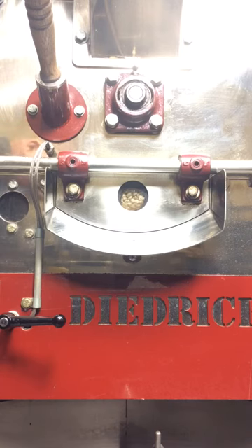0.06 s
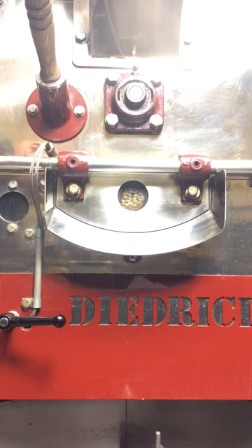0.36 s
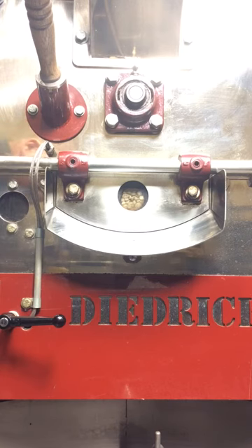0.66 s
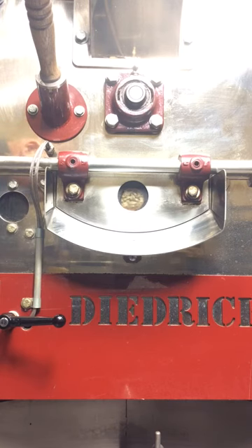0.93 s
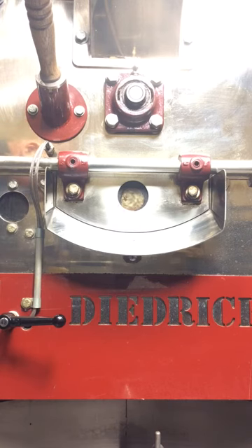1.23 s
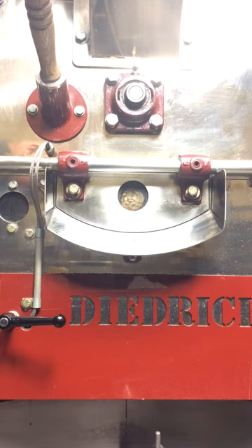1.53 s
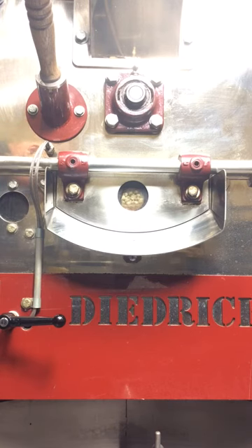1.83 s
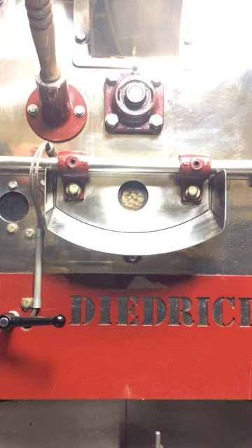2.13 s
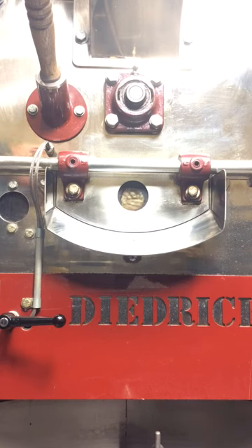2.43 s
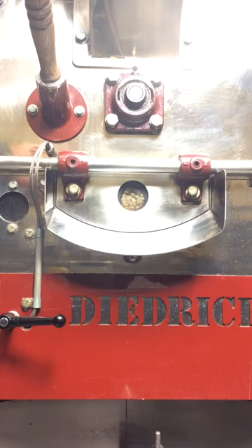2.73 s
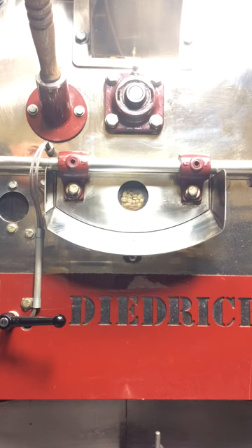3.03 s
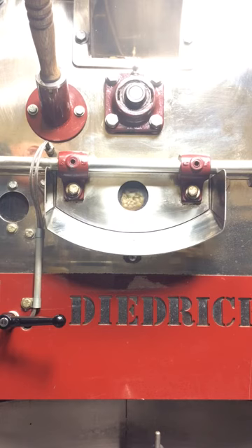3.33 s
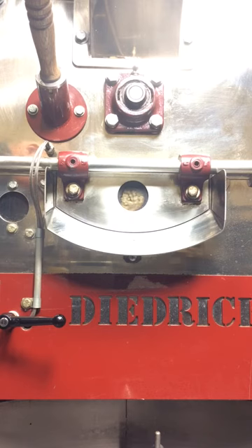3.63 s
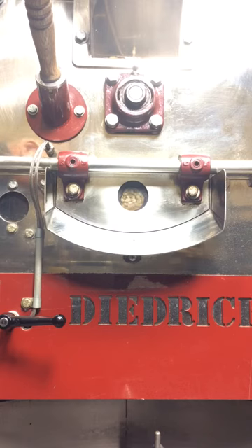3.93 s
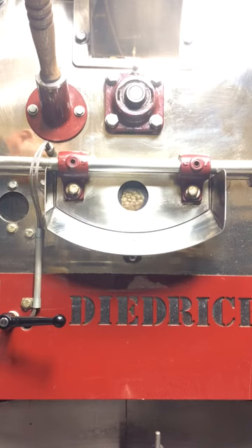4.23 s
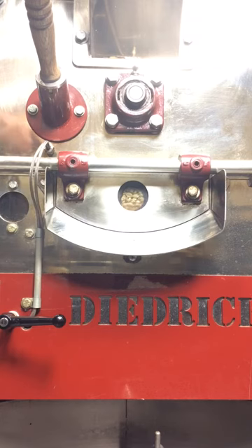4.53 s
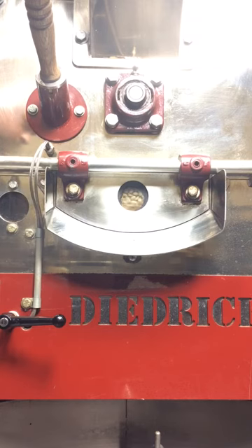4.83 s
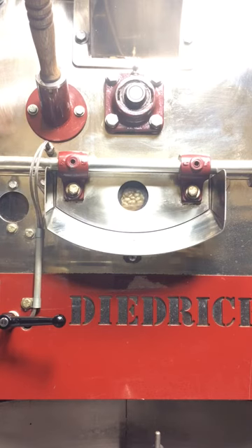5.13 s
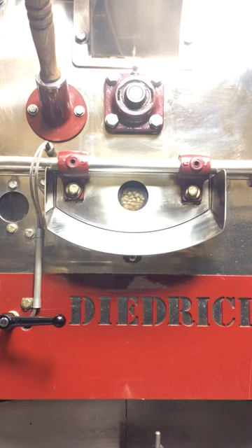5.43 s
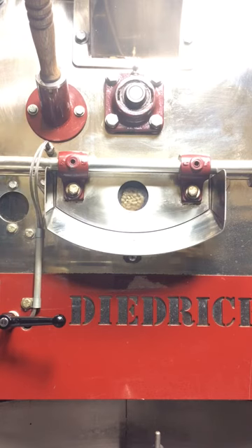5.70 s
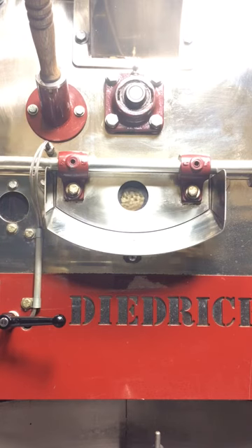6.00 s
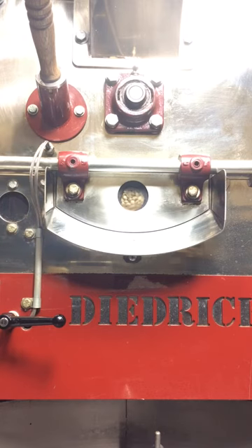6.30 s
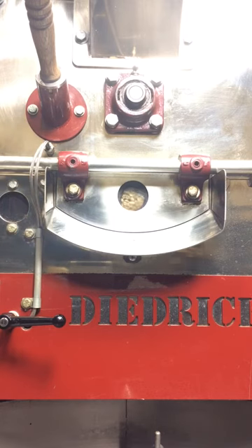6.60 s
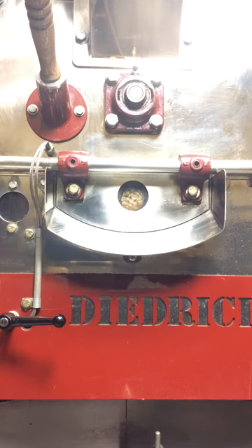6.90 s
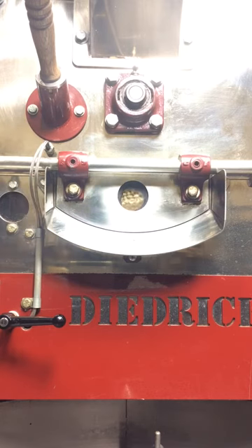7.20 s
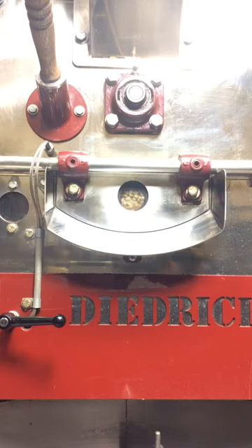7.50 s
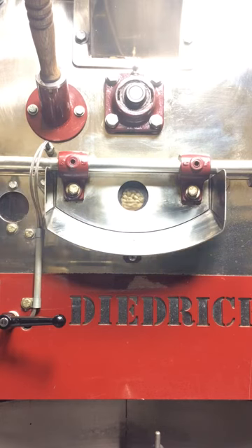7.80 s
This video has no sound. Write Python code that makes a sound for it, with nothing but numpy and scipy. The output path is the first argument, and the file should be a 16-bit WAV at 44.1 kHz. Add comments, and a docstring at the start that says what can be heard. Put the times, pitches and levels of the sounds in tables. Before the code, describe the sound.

Close to a drum coffee roaster indoors, beans swish and rattle lightly in a regular rhythm, roughly three showers a second, with tiny pings and occasional sharper ticks against steel. Beneath them, and louder, the fan and motor drone on one pitch while the gas flame rumbles and air rushes. The machine keeps going throughout with hardly any change.

```python
"""Gas-fired drum coffee roaster, up close

Flame booming in the firebox and draught rushing through the ducts lay down a steady bed, and the
blower sings over it on its blade rate. The tumbling load rings the steel shell softly. On top, vanes
throw the beans about three times a second: each shower is a surge of hiss and tiny pings, and now
and then a stray bean ticks on the metal."""
import sys
import numpy as np
from scipy import signal
from scipy.fft import rfft, irfft
from scipy.io import wavfile

SR = 44100
rng = np.random.default_rng(int(sys.argv[2]) if len(sys.argv) > 2 else 0)


def output_pcm(signal):
    """Save a mono or channel-first signal as 16-bit PCM at the path in sys.argv[1].

    Samples are clipped to [-1, 1] before scaling.
    """
    pcm = np.clip(np.atleast_2d(signal).T, -1, 1) * 32767
    wavfile.write(sys.argv[1], SR, np.round(pcm).astype(np.int16))


N = 350595

# rush of the draught: (frequency [Hz], level [dB per Hz])
DRAUGHT_SPECTRUM = [(200, -82), (370, -61), (474, -61.5), (502, -76.5), (620, -72.5), (675, -77),
                    (790, -80), (930, -83.5), (1500, -92.5), (6000, -110)]
# air resonances of the ducts: (frequency [Hz], width [Hz], level [dB per Hz])
DUCT_MODES = [(534, 26.6, -65), (581.6, 14.6, -66.5)]
# swell of the duct resonances as the draught picks up: (time [s], gain [dB])
DUCT_SWELL = [(0, -1.5), (3.8, -1), (4.7, 2.5), (5.4, 1.5), (6.2, 0), (7.95, 0.5)]
# boom of the flame: (frequency [Hz], level [dB per Hz])
FLAME_SPECTRUM = [(20, -95), (30, -87), (38, -86), (48, -85), (57, -66), (68, -67.5), (100, -55.5),
                  (150, -52.5), (345, -50), (385, -70), (600, -100)]
# air resonances of the firebox: (frequency [Hz], width [Hz], level [dB per Hz])
FIREBOX_MODES = [(167, 29, -53), (183.2, 9.1, -47.5), (299, 37, -49)]
# brief chance swells in the low rumble, at the firebox resonances: (time [s], frequency [Hz], level [dB])
RUMBLE_SWELLS = [(0.05, 178, -28), (0.41, 190, -28), (0.591, 197, -27), (0.82, 165, -24.5),
                 (1.15, 180, -31.5), (1.23, 292, -28), (1.481, 168, -28), (2.639, 295, -28),
                 (2.83, 306, -27.5), (3.14, 300, -25), (3.28, 174, -27.5), (4.29, 299, -28.5),
                 (4.49, 292, -29), (5.329, 180, -25.5), (5.86, 295, -28.5), (6.25, 295, -26.5),
                 (6.38, 295, -26), (6.59, 301, -24.5), (7.11, 184, -25), (7.391, 293, -28), (7.8, 183, -27)]
# tones of the six-bladed fan: (harmonic [x shaft rate], level [dB])
FAN_TONES = [(1, -54), (6, -29), (10, -64.5), (12, -58), (18, -57), (20, -64), (30, -74), (50, -75)]
# motor hum and the panels that drone with it: (frequency [Hz], level [dB], waver [0-1])
MOTOR_DRONES = [(119.8, -45, 0.4), (162.9, -40.5, 0.45), (202.7, -41.5, 0.5), (740, -55, 0.9),
                (2037, -67, 0.9), (3537, -75, 0.6)]
# ring of the drum's steel shell, low to high: (frequency [Hz], width [Hz], level [dB per Hz])
SHELL_MODES = [(739, 29, -65.5), (766.6, 23.5, -67), (825, 26, -75), (855, 26, -71.5), (988, 39, -79),
               (1043, 49, -71.5), (1133, 24, -82.5), (1317, 27, -80), (1368, 24, -87), (1483, 28, -86),
               (1568, 14, -81.5), (1674, 30, -84), (1836, 53, -83), (1933, 56, -81.5), (2008, 48, -77.5),
               (2327, 49, -87)]
# showers off the vanes, two per sway of the load: (crest time [s], rise in flow [dB])
VANE_THROWS = [(-0.05, 4.5), (0.29, 5.5), (0.63, 3.5), (0.92, 4.5), (1.28, 4), (1.63, 4), (1.99, 3.5),
               (2.28, 4), (2.66, 4), (2.97, 5), (3.34, 3), (3.62, 5), (4.01, 3.5), (4.33, 5), (4.68, 4),
               (4.98, 4.5), (5.35, 4.5), (5.66, 4), (6.03, 3), (6.35, 4), (6.71, 4.5), (7, 5.5),
               (7.37, 3.5), (7.68, 5)]
# lulls where a vane runs empty, and one small lift: (time [s], change in flow [dB])
FLOW_NUDGES = [(0.79, 0.5), (2.47, -0.8), (3.15, -1), (3.86, -0.5), (4.84, -0.5), (6.51, -2), (7.88, -1.5)]
# hiss of bean on bean and bean on steel: (frequency [Hz], level [dB per Hz])
BEAN_SPECTRUM = [(900, -99), (1700, -87), (2300, -86.5), (2800, -93.5), (2980, -94), (3300, -90),
                 (4450, -90.5), (5100, -90), (6500, -89.5), (7000, -90.5), (8100, -89.5), (10000, -95.5),
                 (12500, -102.3), (13400, -109), (15200, -112)]
# front plate rung by the beans: (frequency [Hz], width [Hz], level [dB per Hz])
PLATE_MODES = [(2450, 110, -90), (2605, 42, -83), (2715, 25, -86), (2775, 56, -84.5), (3160, 70, -88.5),
               (3530, 140, -89.5), (3730, 37, -85), (3850, 64, -83.5), (3980, 35, -91.5), (4087, 66, -83.5),
               (4860, 320, -88), (5570, 120, -90), (5930, 60, -89), (6300, 60, -86), (7680, 270, -89.5),
               (8130, 120, -94), (9240, 220, -93.5)]
# bright bean ticks, and one brief swell of the shell's low ring near 750 Hz:
# (time [s], level [dB], ring frequency [Hz], ring width [Hz], decay [s])
STEEL_ACCENTS = [(0.601, -53, 5870, 80, .025), (2.7403, -53.5, 12300, 600, .004),
                 (2.872, -37.5, 757, 12, 0.051), (3.3824, -52.5, 12200, 600, .004),
                 (3.383, -50, 2830, 160, 0.016), (3.568, -50, 4220, 150, .012),
                 (3.654, -49, 2630, 93, 0.017), (4.408, -46, 4000, 3000, .006),
                 (4.8041, -46, 3870, 100, .015), (4.8036, -47, 8000, 3700, 0.01),
                 (5.1923, -46, 2680, 900, 0.0073), (5.1923, -47, 8800, 2500, .005),
                 (5.722, -50, 2830, 120, 0.015), (5.973, -51, 4565, 120, .012),
                 (6.171, -49, 9500, 2000, .004), (6.331, -50, 3820, 350, .016),
                 (6.5706, -46, 3770, 420, 0.013), (7.044, -49, 3180, 170, .015)]

AIR_BEFORE_DB, AIR_AFTER_DB = -0.6, 0.6  # the draught lifts a little and stays there
AIR_RISE_AT_S, AIR_RISE_S = 4.6, 0.98
FLAME_TRIM_DB, SWELL_HALF_S = -0.47, 0.037
SHAFT_HZ = 58.73
SWAY_HZ, SWAY_PEAK_S = 1.481, 0.23  # the load rocks in the drum
THROW_RISE_S, THROW_FALL_S, NUDGE_HALF_S = 0.1, 0.14, 0.066
CLUMP_DB, CLUMP_HZ = 0.7, 26  # the beans fall in uneven clumps
PING_LOW_HZ, PING_HIGH_HZ, PING_TILT_DB_PER_OCTAVE = 3094, 8450, 0.7
HIGH_CUT_HZ = 15250


def undb(db):
    """Decibels to gain."""
    return 10 ** (np.asarray(db) / 20)


def unit(x):
    """Scale to rms 1."""
    return x / np.sqrt(np.mean(x ** 2))


def times():
    """Time of every sample."""
    return np.arange(N) / SR


def freqs():
    """Frequency of every spectral bin, floored at 1 Hz."""
    return np.maximum(np.arange(N // 2 + 1) * SR / N, 1)


def drift(rate_hz):
    """Random modulator of rms 1 that moves little faster than the rate."""
    return unit(irfft(rfft(rng.standard_normal(N)) / (1 + (freqs() / rate_hz) ** 4), N))


def eq_curve(points):
    """Gain per bin through (Hz, dB) points, rolling off above the last one."""
    hz, db = np.transpose(points)
    return undb(np.interp(np.log(freqs()), np.log(hz), db)) * np.minimum(1, hz[-1] / freqs()) ** 2


def resonances(modes):
    """Gain per bin of steep resonances whose powers add."""
    peaks = (undb(db) / (1 + 2 * ((freqs() - hz) / width) ** 2) for hz, width, db in modes)
    return np.sqrt(sum(peak ** 2 for peak in peaks))


def colour(x, gain):
    """Give a white excitation the level per Hz of a gain curve."""
    return irfft(rfft(unit(x)) * gain, N) * np.sqrt(SR / 2)


def impacts(per_s, spread_db):
    """A dense rain of small clicks: many weak ones, few strong."""
    hit = rng.random(N) < per_s / SR
    return hit * rng.standard_normal(N) * undb(spread_db * rng.exponential(size=N))


def tone(hz, waver, rate_hz):
    """A held tone that turbulent air shakes in level and phase."""
    shake = 1 + waver * (drift(rate_hz) + 1j * drift(rate_hz))
    return unit(np.real(shake * np.exp(2j * np.pi * (hz * times() + rng.random()))))


def draught():
    """Air rushes through the ducts and sets them sounding, picking up just past midway."""
    rush = colour(rng.standard_normal(N), eq_curve(DRAUGHT_SPECTRUM))
    ducts = colour(rng.standard_normal(N), resonances(DUCT_MODES))
    rush_db = np.interp(times() - AIR_RISE_AT_S, [0, AIR_RISE_S], [AIR_BEFORE_DB, AIR_AFTER_DB])
    duct_db = np.interp(times(), *np.transpose(DUCT_SWELL))
    return rush * undb(rush_db) + ducts * undb(duct_db)


def flame():
    """The turbulent flame booms in the firebox; here and there the rumble swells at a resonance."""
    body = np.hypot(eq_curve(FLAME_SPECTRUM), resonances(FIREBOX_MODES))
    boom = colour(rng.standard_normal(N), body) * undb(FLAME_TRIM_DB)
    for s, hz, db in RUMBLE_SWELLS:
        age = times() - s
        swell = np.sqrt(2) * np.sin(2 * np.pi * (hz * age + rng.random()))
        boom += undb(db) * swell * np.exp(-(age / SWELL_HALF_S) ** 2)
    return boom


def blower():
    """The fan sings its shaft and blade tones over the hum of motor and panels."""
    fan = sum(undb(db) * tone(round(order) * SHAFT_HZ, waver=0.15, rate_hz=5.8)
              for order, db in FAN_TONES)
    hum = sum(undb(db) * tone(hz, waver, rate_hz=2.64) for hz, db, waver in MOTOR_DRONES)
    return fan + hum


def drum_shell(sway_db):
    """The tumbling load rings the shell: low modes hold steady, higher ones breathe with its sway."""
    low = colour(impacts(per_s=2500, spread_db=0.5), resonances(SHELL_MODES[:4]))
    high = colour(impacts(per_s=8000, spread_db=0.5), resonances(SHELL_MODES[4:]))
    sway = np.cos(2 * np.pi * SWAY_HZ * (times() - SWAY_PEAK_S))
    return low + high * undb(sway_db * sway)


def steel_accents():
    """Beans ping (narrow ring) or click (wide ring) on the steel; once, the shell's low ring swells."""
    out = np.zeros(N)
    for s, db, hz, width, decay_s in STEEL_ACCENTS:
        age = times() - s
        pitch_hz = hz + width / 2 * drift(width / 2)
        ring = unit(np.sin(2 * np.pi * np.cumsum(pitch_hz) / SR))
        out += undb(db) * ring * (age >= 0) * np.exp(-np.abs(age) / decay_s)
    return out


def bean_flow():
    """Flow off the vanes in dB about its mean: each throw swells, then thins until the next one."""
    flow_db = np.zeros(N)
    for s, crest_db in VANE_THROWS:
        age = times() - s
        shower = np.exp(-(age / np.where(age < 0, THROW_RISE_S, THROW_FALL_S)) ** 2)
        flow_db = np.maximum(flow_db, crest_db * shower)
    for s, change_db in FLOW_NUDGES:
        flow_db += change_db * np.exp(-((times() - s) / NUDGE_HALF_S) ** 2)
    return flow_db - flow_db.mean() + CLUMP_DB * drift(CLUMP_HZ)


def bean_pings(flow_db, count, gain_db, decay_s, depth):
    """Beans land all over the drum, each ringing one of its many modes, the high ones a touch louder."""
    age = times()[:SR // 10]
    out = np.zeros(N + len(age))
    for when, spot, force in rng.random((count, 3)):
        hz = PING_LOW_HZ * (PING_HIGH_HZ / PING_LOW_HZ) ** spot
        size = force ** 2 * undb(PING_TILT_DB_PER_OCTAVE * np.log2(hz / PING_LOW_HZ))
        start = int(when * N)
        out[start:start + len(age)] += size * np.sin(2 * np.pi * hz * age) * np.exp(-age / decay_s)
    return out[:N] * undb(gain_db + depth * flow_db)


def bean_showers(flow_db, crossover_hz, roll_depth, fall_depth):
    """Showers of tiny clicks: the bright fall surges with each throw, the duller roll moves less."""
    body = np.hypot(eq_curve(BEAN_SPECTRUM), resonances(PLATE_MODES))
    bright = 1 / (1 + (crossover_hz / freqs()) ** 6)
    falling = colour(impacts(per_s=30000, spread_db=-1.5), body * np.sqrt(bright))
    rolling = colour(impacts(per_s=14000, spread_db=1.2), body * np.sqrt(1 - bright))
    return falling * undb(fall_depth * flow_db) + rolling * undb(roll_depth * flow_db)


def reflections(x, t60_s, wet_db):
    """Steel panels and near walls add a tight tail that colours the rattle."""
    age = times()[:SR // 4]
    tail = rng.standard_normal(len(age)) * np.exp(-np.log(1000) * age / t60_s)
    wet = signal.fftconvolve(x, tail / np.linalg.norm(tail))[:N]
    return (x + undb(wet_db) * wet) / np.hypot(1, undb(wet_db))


def scene():
    """Mono mix: the dry machine bed, with the beans and their reflections on top."""
    flow_db = bean_flow()
    rattle = bean_showers(flow_db, crossover_hz=4000, roll_depth=0.29, fall_depth=0.93) + steel_accents()
    rattle += bean_pings(flow_db, count=1200, gain_db=-53.5, decay_s=0.024, depth=0.84)
    rattle = reflections(rattle, t60_s=0.044, wet_db=-17.5)
    bed = blower() + flame() + draught() + drum_shell(sway_db=0.5)
    return (bed + rattle)[None]


def record(dry):
    """A steep high cut takes the very top off the mix."""
    return signal.sosfilt(signal.ellip(10, .1, 80, HIGH_CUT_HZ, fs=SR, output="sos"), dry)


dry = scene()
out = record(dry)
output_pcm(out)
```